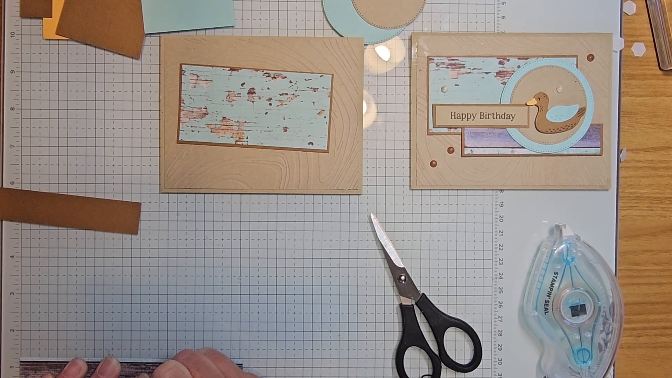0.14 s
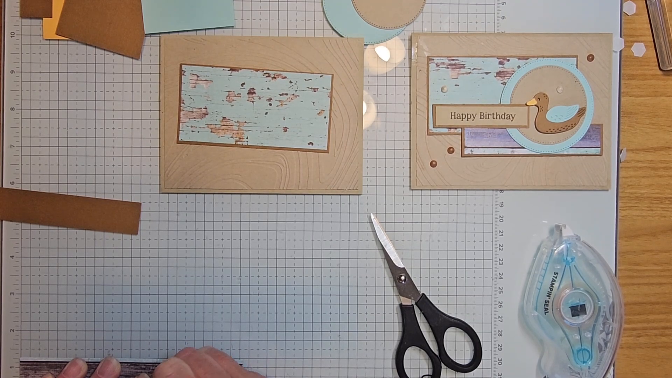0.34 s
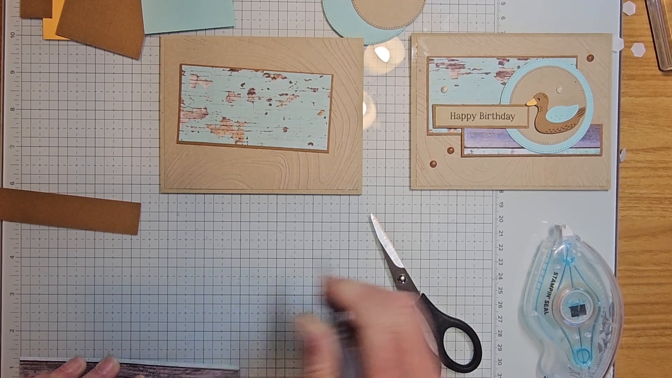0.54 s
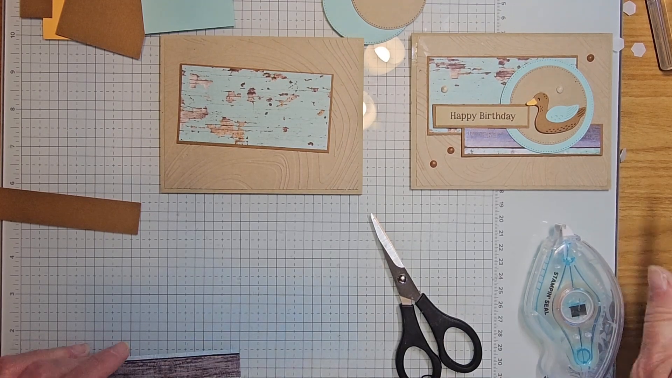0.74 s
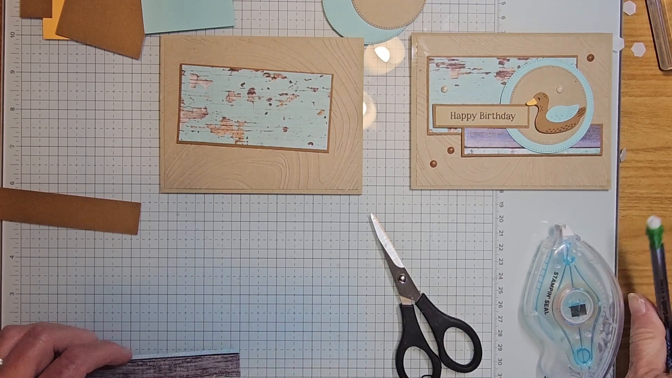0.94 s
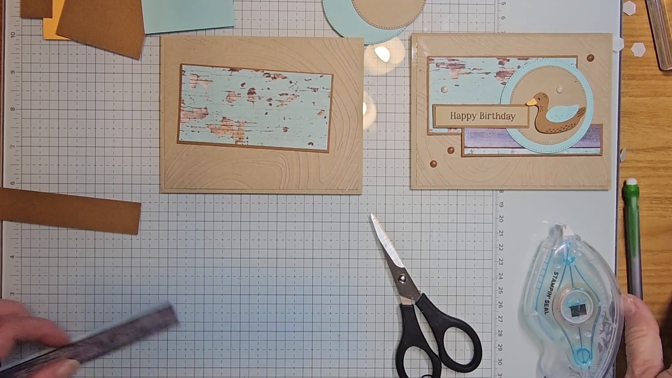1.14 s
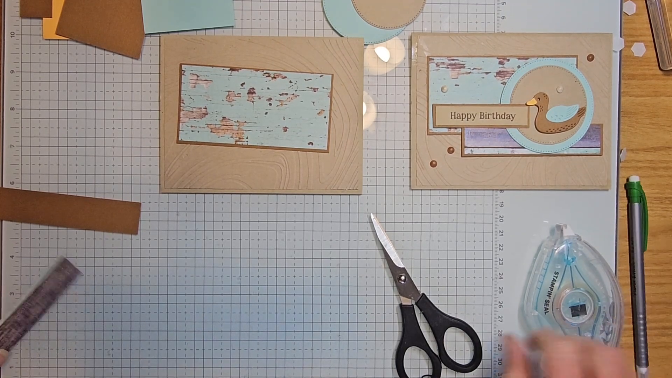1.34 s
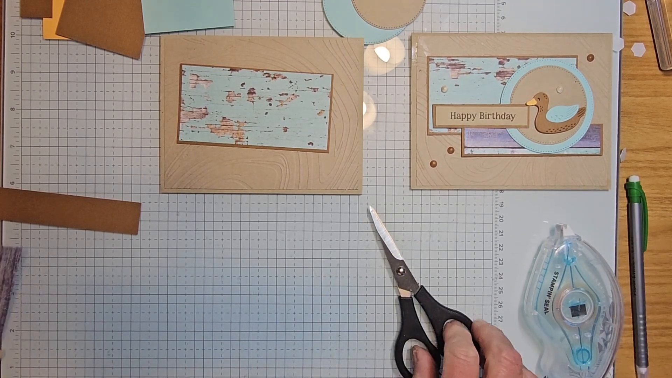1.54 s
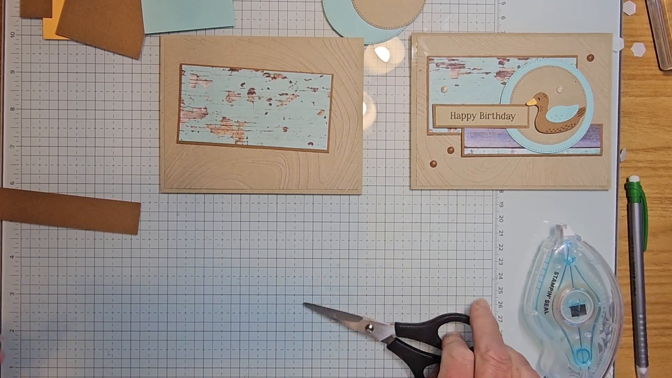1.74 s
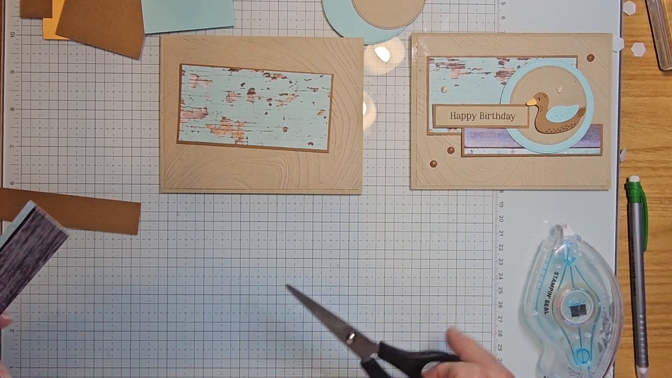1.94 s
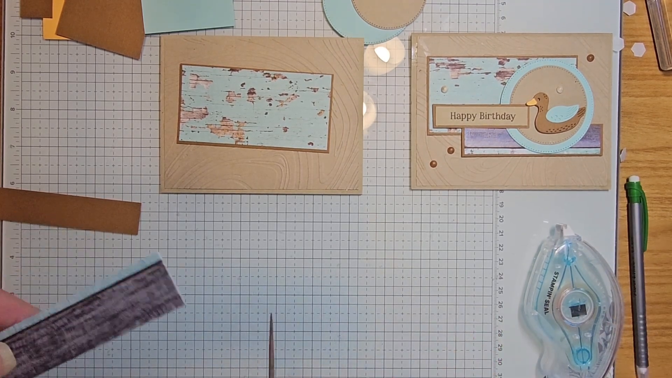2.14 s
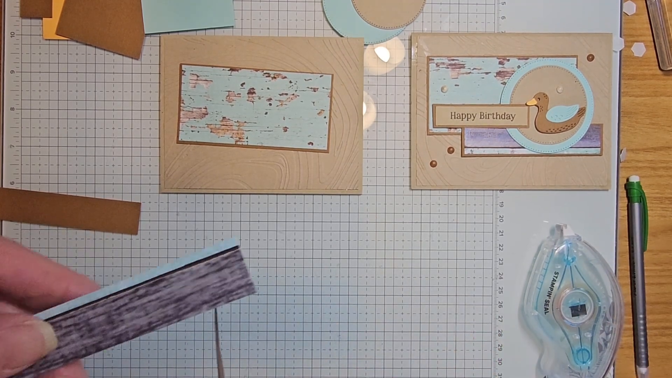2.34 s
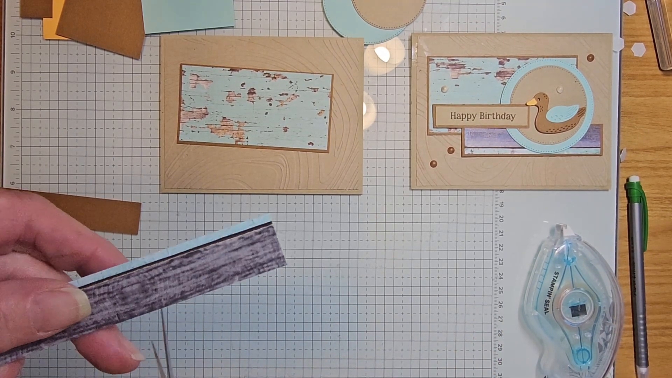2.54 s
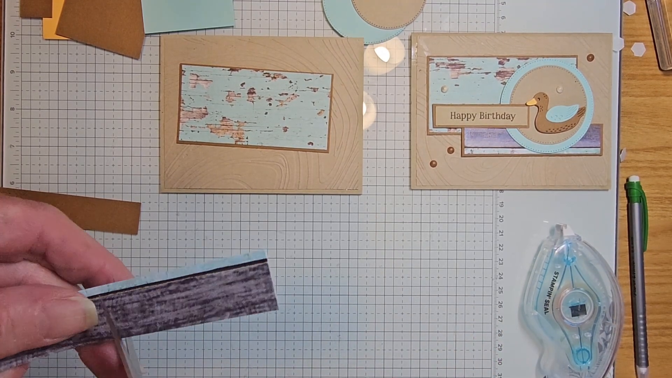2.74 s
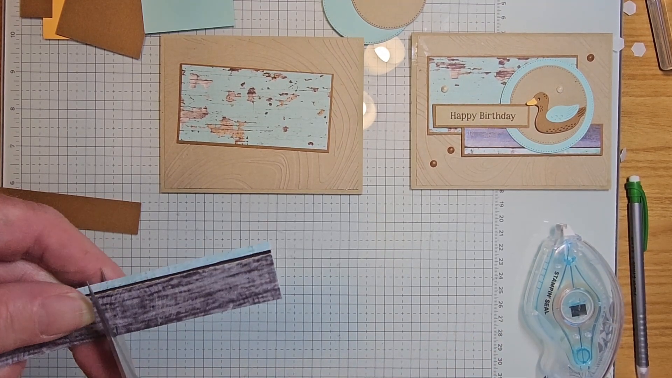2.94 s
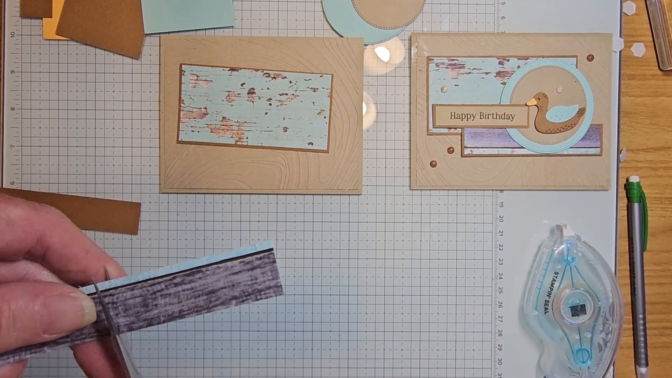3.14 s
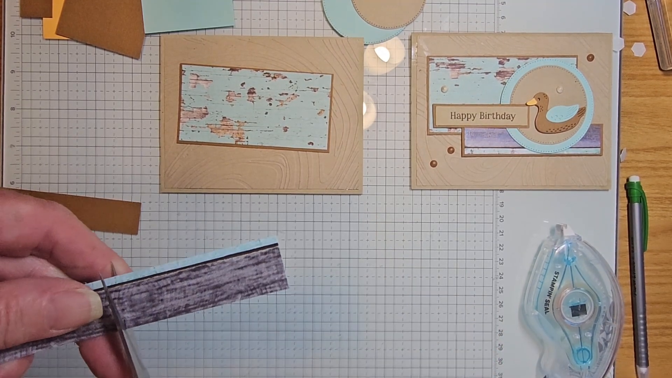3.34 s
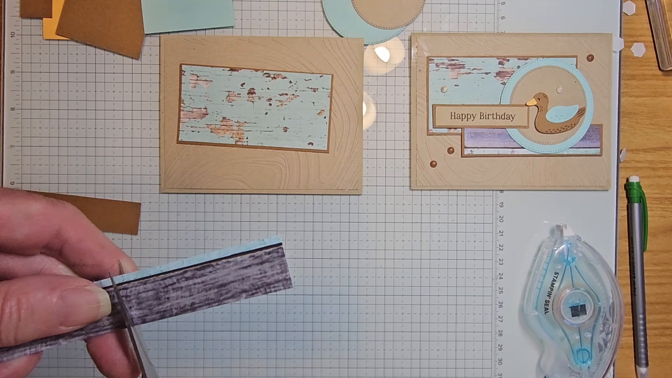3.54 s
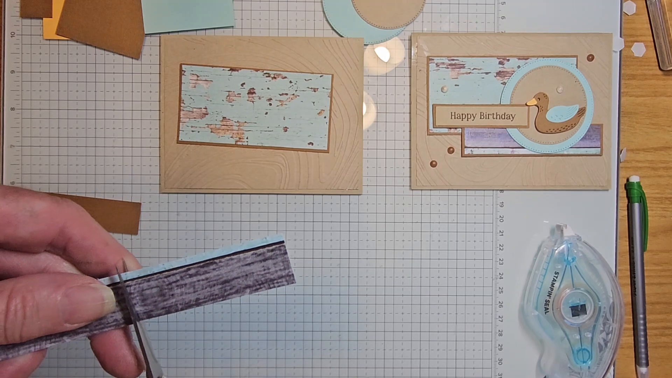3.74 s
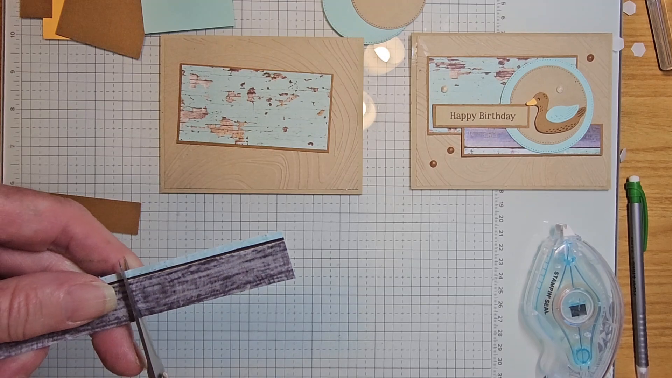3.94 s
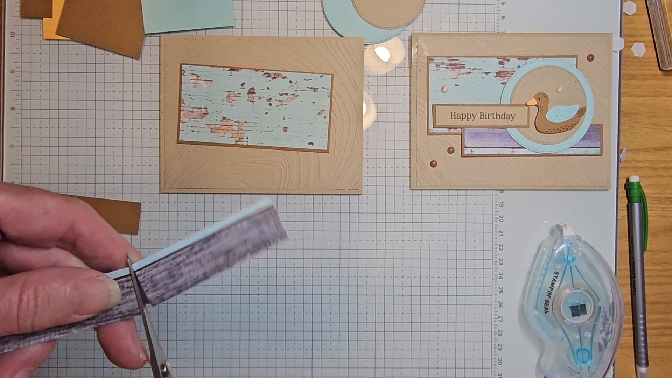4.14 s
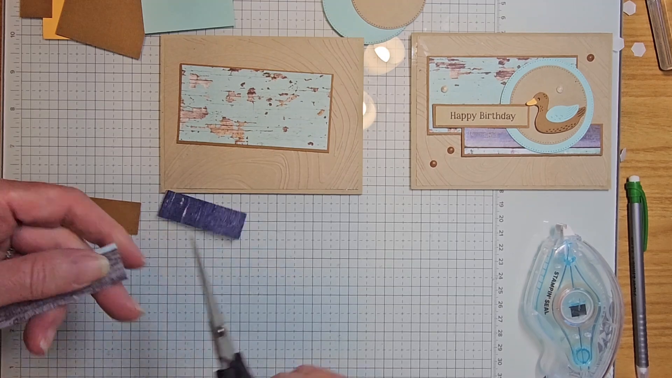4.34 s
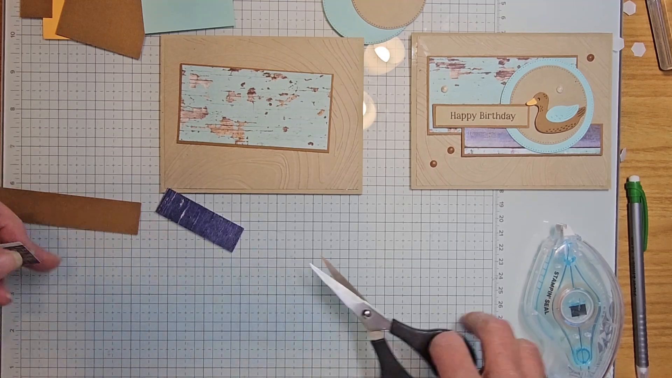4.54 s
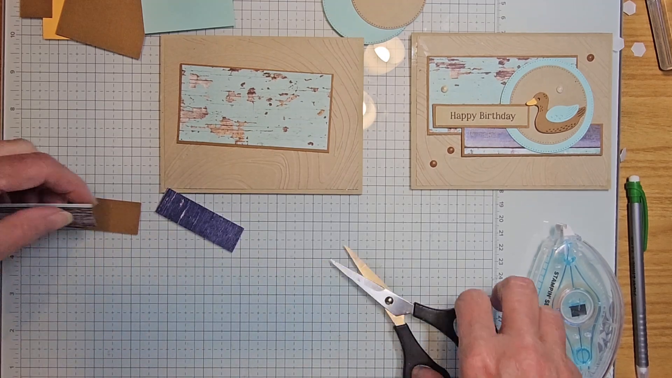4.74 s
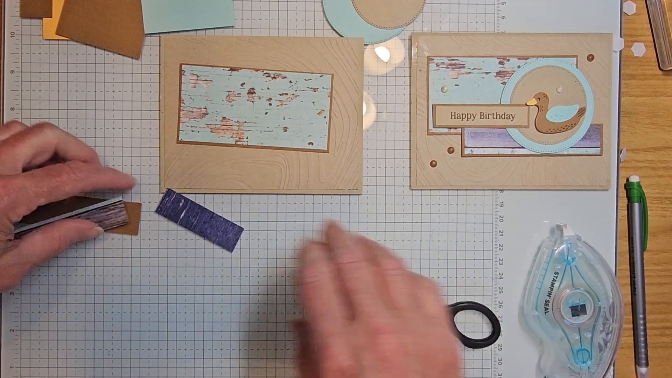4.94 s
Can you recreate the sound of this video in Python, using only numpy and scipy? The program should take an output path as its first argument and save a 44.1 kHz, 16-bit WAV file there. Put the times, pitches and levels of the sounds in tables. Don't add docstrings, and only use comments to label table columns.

```python
import sys
import numpy as np
from scipy import signal
from scipy.fft import rfft, irfft, next_fast_len
from scipy.io import wavfile
from scipy.ndimage import uniform_filter1d, map_coordinates

SR = 44100
rng = np.random.default_rng(int(sys.argv[2]) if len(sys.argv) > 2 else 0)


def magnitude_from_level(level_db):
    exponent = np.asarray(level_db, float) / 20
    return 10 ** exponent


def wav_out(sig):
    wavfile.write(sys.argv[1], SR, np.round(np.clip(np.atleast_2d(sig).T, -1, 1) * 32767).astype(np.int16))


N = 224149


def unit(x):
    return x / np.sqrt(np.mean(np.abs(x) ** 2) + 1e-20)


def along(points, hz):
    f, v = np.transpose(points)
    return np.interp(np.log(hz + 1), np.log(f + 1), v)


def over_time(points):
    return np.interp(np.arange(N) / SR, *np.transpose(points))


def wobble(rate_hz):
    knots = rng.standard_normal(int(N * rate_hz / SR) + 4)
    return map_coordinates(knots, [np.arange(N) * rate_hz / SR], order=1)


def patches(shape, bins, frames):
    field = uniform_filter1d(rng.standard_normal(shape), size=bins, axis=0)
    return unit(uniform_filter1d(field, size=frames, axis=1))


def filtered(x, response):
    m = next_fast_len(N + SR // 2)
    return irfft(rfft(x, m) * response(np.fft.rfftfreq(m, 1 / SR)), m)[..., :N]


def modes(peaks, hz):
    f = hz[::8]
    total = sum(magnitude_from_level(db) * 1j * f * w / (c * c - f * f + 1j * f * w) for c, w, db in peaks)
    return np.interp(hz, f, total)


def band(edges_hz, f):
    low, high = 1j * f / edges_hz[0], 1j * f / edges_hz[1]
    highpass = low ** 2 / (1 + np.sqrt(2) * low + low ** 2)
    return highpass / (1 + np.sqrt(2) * high + high ** 2)


# f/Hz, likeness/1
LIKENESS = [(60, 0.84), (300, 0.76), (700, 0.059), (1500, 0.0047), (15000, 0)]


def ports(pair):
    def mid_side(hz):
        angle = np.arccos(np.clip(along(LIKENESS, hz), -1, 1)) / 2
        return np.sqrt(2) * np.array([np.cos(angle), np.sin(angle)])
    mid, side = filtered(pair, mid_side)
    return np.array([mid + side, mid - side])


# f/Hz, t60/s
ROOM_DECAY = [(200, 0.13), (2000, 0.19), (12000, 0.079)]


def walls(x):
    hz, t, z = signal.stft(rng.standard_normal((2, SR // 2)), SR, nperseg=256)
    tail = signal.istft(z * magnitude_from_level(-60 * t / along(ROOM_DECAY, hz)[:, None]), SR, nperseg=256)[1]
    late = np.pad(x, ((0, 0), (300, 0)))
    return signal.fftconvolve(late, tail / np.linalg.norm(tail[0]), axes=1)[:, :N]


def nearby(hz):
    t = np.arange(SR // 100) / SR
    scatter = rng.standard_normal(len(t)) * magnitude_from_level(-60 * t / .003)
    drift = unit(rfft(scatter, 2 * (len(hz) - 1)).real)
    turn = 1.152 * hz ** 2 / (hz ** 2 + 950 ** 2)
    return np.exp(1j * turn * drift * np.array([[1], [-1]]))


def turning(x, patchy_db):
    z = signal.stft(x, nperseg=256)[2]
    gain_db = patchy_db * patches(z.shape[1:], 5, 5) - patchy_db ** 2 / 9
    return signal.istft(z * magnitude_from_level(gain_db), nperseg=256)[1][:, :N]


def touches(rows, t60, pan_db):
    return [(*row, t60, pan_db) for row in rows]


def strokes(rows, knock_db, fizz_db, edge_db):
    return [[(s, db + fall, db + fall + knock_db - speed, db + fall + fizz_db + speed)
             for s, fall in ((start, -edge_db), (peak, 0), (end, -edge_db))]
            for start, peak, end, db, speed in rows]


# low f/Hz, high f/Hz
KNOCK_BAND, CLICK_BAND, FIZZ_BAND = (231, 1500), (1500, 6600), (6800, 15500)


def thing(contacts, rubs, peaks, ring_db, dull_db, grit_db, rise, crack=0):
    t, clock = np.arange(SR // 4) / SR, np.arange(N) / SR
    strength = np.zeros((3, N + SR))
    lean_db = np.zeros(N + SR)
    for s, db, knock_db, fizz_db, t60, pan_db in contacts:
        i = round(s * SR)
        attack_s = rise * np.clip((-db - 17.5) / 30, .08, 1)
        slower = np.array([[.7], [1], [1.3]])
        fade = magnitude_from_level(-60 * slower * t / max(t60, .005)) * (1 - np.exp(-t / attack_s))
        fade[1:] += crack * magnitude_from_level(-60 * t / .007) * (1 - np.exp(-t / .0003))
        levels_db = db - 6.5 + np.array([[knock_db + 6.0], [0], [fizz_db + 3.5]])
        strength[:, i:i + len(t)] += magnitude_from_level(levels_db) * fade
        lean_db[i - SR // 500:] = pan_db / 2
    grit = unit(magnitude_from_level(grit_db * (wobble(900) + 1.1 * wobble(60))))
    for rows in rubs:
        s, click_db, knock_db, fizz_db = np.transpose(rows)
        for k, db in enumerate((knock_db, click_db, fizz_db)):
            strength[k, :N] += grit * magnitude_from_level(np.interp(clock, s, db, left=-200, right=-200))
    m = next_fast_len(N + SR // 2)
    f = np.fft.rfftfreq(m, 1 / SR)
    ring = magnitude_from_level(ring_db) * modes(peaks, f)
    shared, own = rng.standard_normal((3, 1, N)), rng.standard_normal((3, 2, N))
    grains = unit(shared + np.reshape([.15, .6, .5], (3, 1, 1)) * own)
    forces = rfft(strength[:, None, :N] * grains, m)
    bands = zip(forces, (KNOCK_BAND, CLICK_BAND, FIZZ_BAND), (magnitude_from_level(dull_db), 1, 1))
    sound = sum(force * unit(band(edges_hz, f) * (broad + ring)) for force, edges_hz, broad in bands)
    return irfft(sound * nearby(f), m)[:, :N] * magnitude_from_level(np.array([lean_db[:N], -lean_db[:N]]))


# f/Hz, level/dB per Hz
RUMBLE_SPECTRUM = [(15, -29.5), (25, -9.5), (97, 0.5), (162, -5), (194, -6), (279, -15.5), (339, -2.5),
                   (369, -21), (436, -10), (700, -27), (910, -67), (1540, -120)]
# t/s, level/dB
RUMBLE_SWELL = [(0, -72.5), (.55, -65.5), (1.15, -71.5), (1.7, -63.5), (2.02, -69), (2.6, -69.5),
                (3.2, -65), (3.6, -69), (4.3, -70), (4.8, -57), (4.95, -62), (5.08, -78)]
# f/Hz, level/dB per Hz
HISS_SPECTRUM = [(400, -21.5), (600, -0.5), (900, -5.5), (1600, -3), (2500, -11), (4500, -13), (6000, -20),
                 (10000, -27.5), (13000, -19), (16500, -24)]
# t/s, level/dB
HISS_DRIFT = [(0, -79.5), (1, -74.5), (2.1, -79.5), (2.7, -78), (3.3, -78.5), (4.2, -83.5), (5.08, -69)]


def room_tone():
    z = signal.stft(rng.standard_normal((2, N)), nperseg=2048)[2]
    pair = signal.istft(z * magnitude_from_level(2.5 * patches(z.shape[1:], 3, 6)), nperseg=2048)[1][:, :N]
    lows = unit(filtered(pair, lambda hz: magnitude_from_level(along(RUMBLE_SPECTRUM, hz)) * (hz < 700)))
    white = rng.standard_normal((2, N))
    hiss = unit(filtered(white, lambda hz: magnitude_from_level(along(HISS_SPECTRUM, hz)) * (hz > 300)))
    return ports(magnitude_from_level(over_time(RUMBLE_SWELL) - 1.5) * lows + magnitude_from_level(over_time(HISS_DRIFT)) * hiss)


# t/s, level/dB
CLOCK_STEPS = [(0.284, -52), (1.29, -51), (2.283, -53), (3.272, -54.5), (4.29, -53)]
# f/Hz, level/dB, t60/s
CLOCK_CASE = [(720, -1, 0.037), (1151, -9.5, .06), (2500, -17.5, 0.053), (3060, -14, 0.07),
              (3900, -17, .04)]


def wall_clock():
    step_s, step_rise = .034, .3
    t, out = np.arange(SR // 5) / SR, np.zeros((2, N + SR))
    push = np.abs(np.sin(np.pi * np.clip(t / step_s, 0, 1)))
    for s, db in CLOCK_STEPS:
        tock = np.zeros(len(t))
        for k, (hz, level_db, t60) in enumerate(CLOCK_CASE):
            blur = np.cumsum(rng.normal(0, 0.028, len(t))) * (hz / 800) ** 1.2
            climb = (k < 2) * step_rise * t ** 2 / (2 * step_s)
            fade = magnitude_from_level(level_db + rng.normal(0, 2.6) - 6 * t / t60)
            tock = tock + fade * np.sin(2 * np.pi * hz * (t + climb) + blur)
        for ear, lag in enumerate((11, 0)):
            out[ear, round(s * SR) + lag:][:len(t)] += magnitude_from_level(db) * tock * push
    return out[:, :N]


# t/s, peak level/dB, boom f/Hz, t60/s
TABLE_BLOWS = [(0.087, -42, 94.5, 0.07), (0.322, -42, 75, 0.08), (.668, -48, 110, .05),
               (.62, -57, 77, 0.46), (1.044, -39.5, 81, 0.17), (1.259, -50.5, 100, 0.15),
               (1.559, -34.5, 55, 0.22), (1.61, -31.5, 137, 0.091), (1.741, -48, 72, 0.12),
               (1.878, -46.5, 134.8, 0.2), (3.05, -64, 172, 1.6), (4.511, -43.5, 133, 0.14),
               (4.602, -37, 142, 0.22), (4.733, -27, 50, 0.077), (4.79, -44, 49.6, 0.24),
               (4.919, -40.5, 181.7, 0.19)]
# f/Hz, width/Hz, level/dB
TABLE_TOP = [(55, 33, 13), (128, 51, 15.5), (188, 9.7, 22), (350, 20, -13.5)]


def table():
    t, out = np.arange(SR // 2) / SR, np.zeros(N + SR)
    for s, db, low_hz, t60 in TABLE_BLOWS:
        rumble = signal.lfilter([.03], [1, -.97], rng.standard_normal(len(t)))
        push = np.sin(2 * np.pi * low_hz * t) + 8 * rumble
        fade = magnitude_from_level(db - 11 - 60 * t / max(t60, .02)) * (1 - np.exp(-t / 0.012))
        out[round(s * SR):round(s * SR) + len(t)] += fade * push
    boom = filtered(out[:N], lambda f: 0.17 + modes(TABLE_TOP, f))
    return np.array([boom, np.roll(boom, 14)])


# start t/s, peak t/s, end t/s, click level/dB, speed/dB
SLEEVE_REACH = [(.42, .55, 0.77, -78, -14), (.6, .716, 0.94, -79, 16), (.84, 1.0, 1.12, -71.5, -6.5)]
SLEEVE_LIFT = [(2.0, 2.138, 2.32, -63.5, 5), (2.22, 1.3, 2.36, -75, -8), (1.7, 2.47, 3.01, -82.5, -20.5)]
SLEEVE_SWING = [(4.26, 4.3, 4.36, -62.5, -7.5), (4.32, 4.48, 4.574, -53, 0.5), (4.48, 4.6, 4.71, -42, -1.5)]
# f/Hz, width/Hz, level/dB
SLEEVE_MODES = [(350, 33, 12), (500, 90, 12.5), (1290, 330, -6.5), (1810, 460, -3), (4200, 660, 1.5),
                (11300, 970, -16)]


def sleeve():
    rubs = strokes(SLEEVE_REACH + SLEEVE_LIFT, knock_db=-0.5, fizz_db=-4.0, edge_db=15.5)
    rubs = rubs + strokes(SLEEVE_SWING, knock_db=-3, fizz_db=-9, edge_db=14)
    return thing([], rubs, SLEEVE_MODES, ring_db=5.5, dull_db=-10, grit_db=2.0, rise=1)


# start t/s, end t/s, f/Hz, width/Hz, level/dB
MAT_SKIMS = [
    (.46, .65, 1090, 130, -66),
    (.51, .63, 1480, 260, -67),
    (.84, 1.04, 4700, 400, -76),
    (1.11, 1.19, 730, 70, -57),
    (2.15, 2.75, 490, 60, -69),
    (4.27, 4.46, 3900, 600, -61),
    (4.34, 4.46, 1900, 400, -63),
    (4.48, 4.62, 4100, 700, -53),
]


def skims():
    out = np.zeros((2, N))
    for start, end, hz, width_hz, db in MAT_SKIMS:
        t = np.arange(round((end - start) * SR)) / SR
        rough = uniform_filter1d(rng.standard_normal((2, 2, len(t))), max(int(SR / width_hz), 1))
        swell = np.sin(np.pi * t / (end - start))
        tone = unit(((rough[0] + 1j * rough[1]) * np.exp(2j * np.pi * hz * t)).real)
        out[:, round(start * SR):][:, :len(t)] += magnitude_from_level(db) * swell * tone
    return out


# t/s, f/Hz, level/dB, t60/s
SINGLE_NOTES = [(.141, 720, -60, .06), (.142, 2800, -74, .2), (.142, 4500, -72, .15), (.441, 720, -56, .05),
                (.442, 4600, -66, .03), (.68, 4700, -60, .04), (0.7583, 1960, -42, 0.018),
                (.767, 3500, -40, 0.018), (1.222, 1050, -50, .05), (1.263, 13030, -3, 0.018),
                (1.267, 13060, -26, 0.06), (1.2635, 14500, -20, 0.017), (1.2635, 9300, -22, .015),
                (1.2677, 4400, -13, .014), (1.269, 3100, -17, .02), (1.31, 13030, -33, 0.03),
                (1.311, 1400, -25.5, .02), (1.338, 4200, -37, .025), (1.271, 1390, -20.5, 0.045),
                (1.5717, 1465, -13.5, 0.025), (1.574, 1237, -23.5, 0.052), (1.728, 1100, -37.5, 0.036),
                (1.85, 8140, -32, 0.066), (1.852, 720, -34, 0.04), (1.018, 712, -47.5, 0.072),
                (1.155, 726, -48, 0.059), (4.259, 1500, -32, 0.0096), (2.04, 10300, -49, 0.17),
                (1.953, 4560, -40, .05), (1.988, 4600, -35.5, 0.16), (2.017, 2800, -37, 0.12),
                (2.054, 2800, -48.5, 0.084), (2.739, 3370, -64, .15), (2.742, 1720, -66.5, .2),
                (2.765, 4200, -65.5, .12), (2.828, 7300, -60.5, .05), (2.938, 4200, -71, 0.03),
                (4.698, 4600, -26, 0.043), (4.715, 4550, -26, .035), (4.73, 4600, -26, 0.034),
                (4.935, 1300, -30.5, 0.04), (4.935, 3500, -43, 0.023), (4.453, 5500, -11, 0.0078),
                (4.557, 11300, -30.5, 0.032), (4.611, 7273, -20, 0.24), (4.612, 3490, -7.5, 0.015),
                (4.66, 2030, -26, 0.024), (4.758, 2800, -31, 0.039), (4.7872, 11620, -19, 0.029),
                (4.91, 1300, -38.5, 0.14), (4.924, 1485, -28, 0.062)]


def notes():
    t, out = np.arange(SR // 5) / SR, np.zeros((2, N + SR))
    phases = rng.uniform(0, 2 * np.pi, (len(SINGLE_NOTES), 2, 1))
    for (s, hz, db, t60), phase in zip(SINGLE_NOTES, phases):
        blur = np.cumsum(rng.normal(0, 0.051, len(t))) * np.sqrt(hz / 5000)
        note = np.sin(2 * np.pi * hz * t + blur + .5 * phase * (hz > 3000))
        note = note + 0.35 * np.sin(2 * np.pi * .975 * hz * t + phase)
        out[:, round(s * SR):][:, :len(t)] += magnitude_from_level(db - 60 * t / t60) * (1 - np.exp(-t / .001)) * note
    return out[:, :N]


# t/s, click peak level/dB, weight/dB re click, sharpness/dB re click
PENCIL_MARKING = [
    (.141, -63.5, 8, -24),
    (.4403, -56.5, 4, 9.5),
    (.5728, -63, -1, 12),
    (.6804, -46, -18, -8.5),
    (.7586, -32, -28, -3),
    (.7668, -37, -35, -14),
    (.941, -49, -18, -2),
]
PENCIL_LAYING = [
    (1.0166, -54, 3, -16),
    (1.0513, -25.5, -18, -2),
    (1.1536, -50, 3, -15.5),
    (1.1794, -47.5, -2.5, -13.5),
    (1.2634, -14, -14, -2.5),
    (1.2685, -13, -14, -30),
    (1.2899, -23.5, -16, -6),
    (1.31, -21, -14.5, -5),
    (1.3368, -24.5, -11.5, -17),
]
# start t/s, peak t/s, end t/s, click level/dB, speed/dB
PENCIL_ROLL = [(.44, .56, 0.66, -82, -12), (.98, 1.06, 1.39, -62, -7), (1.17, 1.24, 1.62, -57, 0)]
# f/Hz, width/Hz, level/dB
PENCIL_BARREL = [(715.7, 52, 1), (1390, 280, -4.5), (3107, 390, -9.5), (4420, 270, -3.5), (7140, 220, -12),
                 (8710, 220, -11.5), (13600, 560, -6.5)]


def pencil():
    contacts = touches(PENCIL_MARKING, t60=0.028, pan_db=1.0) + touches(PENCIL_LAYING, t60=0.037, pan_db=-1.0)
    rubs = strokes(PENCIL_ROLL, knock_db=-2.5, fizz_db=-14.5, edge_db=11.5)
    return thing(contacts, rubs, PENCIL_BARREL, ring_db=5, dull_db=-0.5, grit_db=1, rise=0.0021, crack=.9)


# t/s, click peak level/dB, weight/dB re click, sharpness/dB re click
CARD_FEEDING = [
    (2.3331, -63, -15, -3.5),
    (2.3645, -63.5, -22.5, -1),
    (2.4074, -48.5, -34.5, 10),
]
CARD_PARTING = [
    (4.1754, -49, -19, 7.7),
    (4.2502, -38, -6.5, 1),
    (4.2587, -29, -14.5, 1.2),
    (4.3594, -45.5, -22, 2),
    (4.3745, -40.5, -18, 2.4),
]
CARD_LANDING = [
    (4.4518, -16, -22.5, 1.5),
    (4.4654, -36, -29, 12),
    (5.0594, -25.5, -18, 0.5),
]
# start t/s, peak t/s, end t/s, click level/dB, speed/dB
CARD_FEED = [(2.33, 2.342, 2.39, -63.5, 0), (2.39, 2.408, 2.46, -71.5, 0.91)]
CARD_CUT = [(4.168, 4.195, 4.215, -63, 0.5), (4.205, 4.248, 4.254, -55, 0)]
# f/Hz, width/Hz, level/dB
CARD_STRIP = [(1720, 89, 0), (3670, 67, -48), (4620, 2200, 9.5), (5560, 306, -22), (7330, 1100, 8.5),
              (8560, 580, 5), (9200, 190, 0), (11300, 330, 6)]


def card():
    contacts = touches(CARD_FEEDING, t60=0.026, pan_db=-1.5) + touches(CARD_PARTING, t60=0.024, pan_db=-1.0)
    contacts = contacts + touches(CARD_LANDING, t60=0.02, pan_db=2.5)
    rubs = strokes(CARD_FEED + CARD_CUT, knock_db=-7.5, fizz_db=2.5, edge_db=10.0)
    return thing(contacts, rubs, CARD_STRIP, ring_db=-7, dull_db=6, grit_db=1.5, rise=0.0019, crack=.6)


# t/s, click peak level/dB
BLADE_NIBBLES = [(3.567, -63), (3.6144, -59.5), (3.688, -56.5), (3.718, -56), (3.7532, -57.5),
                 (3.7875, -50.5), (3.848, -59.5), (3.874, -55.5), (3.9307, -52), (3.9692, -56.5),
                 (4.008, -56), (4.016, -52.5), (4.092, -58.5), (4.127, -49), (4.1585, -48)]
# start t/s, peak t/s, end t/s, click level/dB, speed/dB
EDGE_SLIDE = [(2.736, 2.742, 2.765, -60, -1.5), (2.755, 2.77, 2.786, -57, -3), (2.79, 2.832, 2.846, -57, -4),
              (2.845, 2.9, 2.92, -65, -6), (2.905, 2.944, 2.955, -57, -4.5)]
EDGE_CREEP = [
    (3.675, 3.729, 3.76, -73, 2),
    (3.829, 3.859, 3.887, -70, 2.5),
    (3.923, 3.933, 3.93, -66, 0.5),
    (3.966, 3.97, 3.97, -68, 4),
    (4.005, 4.014, 4.03, -65, 3),
    (4.03, 4.073, 4.098, -73, 6),
    (4.124, 4.133, 4.155, -66, 5),
]
# f/Hz, width/Hz, level/dB
EDGE_MODES = [(1684, 120, 3), (3370, 150, -3), (4200, 250, 4), (5500, 230, -2), (7500, 600, 13)]


def nibbling():
    weight_db, sharp_db = -15, -0.5
    slips = [(s, db, weight_db, sharp_db) for s, db in BLADE_NIBBLES]
    rubs = strokes(EDGE_SLIDE + EDGE_CREEP, knock_db=-16.5, fizz_db=0.5, edge_db=10.0)
    return thing(touches(slips, t60=0.032, pan_db=-4.0), rubs, EDGE_MODES,
                 ring_db=3, dull_db=5, grit_db=3.5, rise=0.0025, crack=.7)


# t/s, click peak level/dB, weight/dB re click, sharpness/dB re click
SNIPS_PICKUP = [
    (1.5579, -16.5, -9, -5),
    (1.5718, -14.5, -20, -26),
    (1.5944, -43, -5.5, -10.5),
    (1.6194, -39, 3, -16),
    (1.6744, -34, -40, -22),
    (1.7295, -47.5, 5, -23),
    (1.7769, -39, -13, -30),
    (1.8507, -31.5, -6.5, 0.5),
    (1.9016, -37, -1.5, -14),
    (1.95, -33, -26, -12),
]
SNIPS_CLATTER = [(4.5574, -33, -20, 3), (4.6109, -5, -27, -1), (4.6214, -18.5, -42, -8),
                 (4.6334, -13, -19.5, -0.5), (4.6494, -13.5, -26, -2), (4.6624, -21.5, -33, -4.5),
                 (4.698, -17, -20.5, -8), (4.7144, -30.5, -8, -2), (4.7294, -29, -18, -4),
                 (4.7591, -11, -17, -7.5), (4.7674, -23.5, -37, -25), (4.7868, -17.5, -13, -0.5),
                 (4.8329, -23.5, -4, -6), (4.8444, -28, -18.5, 2), (4.8595, -31, -15.5, -5),
                 (4.8744, -28.5, -42, -9), (4.9114, -33.5, 1, -29), (4.9242, -38.5, 2.5, -39),
                 (4.934, -35, -2.5, -29), (4.9404, -35, -2.5, -31)]
# start t/s, peak t/s, end t/s, click level/dB, speed/dB
SNIPS_GRIP = [(1.59, 1.62, 1.73, -41, -1), (1.725, 1.74, 1.77, -52, -8), (1.757, 1.81, 1.86, -47, 0)]
SNIPS_DRAG = [(1.85, 1.87, 1.9, -48, 17), (1.9, 1.99, 2.065, -41, -4), (1.968, 2.002, 2.005, -35, 0),
              (2.008, 2.024, 2.034, -36, -2), (2.032, 2.047, 2.076, -42.5, 5)]
SNIPS_SETTLE = [(4.67, 4.72, 4.75, -42.5, 1.5), (4.75, 4.82, 4.93, -41, -4), (4.86, 4.93, 4.98, -47.5, -16),
                (5.02, 5.07, 5.15, -53.5, -5)]
# f/Hz, width/Hz, level/dB
SNIPS_STEEL = [(350.8, 8.1, 7), (715.6, 51, 3), (1104.6, 40, 3.5), (1300, 42, -6.5), (1485, 55, -8.5),
               (2030, 150, -2), (2469, 31, 2.5), (2800, 61, 7), (3537, 170, 2.5), (4180, 140, 4.5),
               (4530, 94, 4), (4850, 111, -1), (5850, 79, -2.5), (6800, 79, -3.5), (7273, 33, 1.5),
               (8200, 70, -2), (10300, 61, -11.5), (11620, 98, -16.5)]


def snips():
    contacts = touches(SNIPS_PICKUP, t60=0.052, pan_db=-0.9) + touches(SNIPS_CLATTER, t60=0.056, pan_db=-1.1)
    rubs = strokes(SNIPS_GRIP + SNIPS_DRAG, knock_db=-12.0, fizz_db=-25.5, edge_db=13)
    rubs = rubs + strokes(SNIPS_SETTLE, knock_db=-15.0, fizz_db=3.5, edge_db=10.0)
    return thing(contacts, rubs, SNIPS_STEEL, ring_db=1.0, dull_db=-11.5, grit_db=2.5, rise=0.0014)


def scene():
    handled = sleeve() + pencil() + card() + nibbling() + snips()
    near = turning(handled, patchy_db=2.5) + notes() + skims()
    tick = wall_clock()
    echoes = magnitude_from_level(-11.5) * ports(walls(near)) + magnitude_from_level(-8.5) * walls(tick)
    return room_tone() + tick + table() + echoes + near


def low_pass(x):
    return signal.sosfilt(signal.butter(12, 16790, fs=SR, output="sos"), x)


def record(dry):
    top_hz, end_hz = 14800, 15910
    rounded = dry / (1 + np.abs(dry / .85) ** 6) ** (1 / 6)
    heard = filtered(rounded, lambda hz: 1 / np.sqrt(1 + (hz / top_hz) ** 30 + (hz / end_hz) ** 250 * 100))
    return low_pass(heard)


dry = scene()
out = record(dry)
wav_out(out)
```